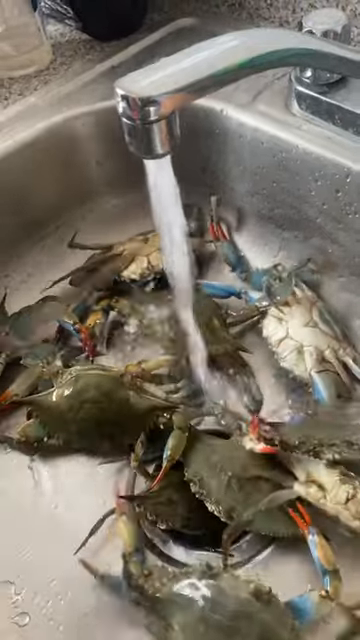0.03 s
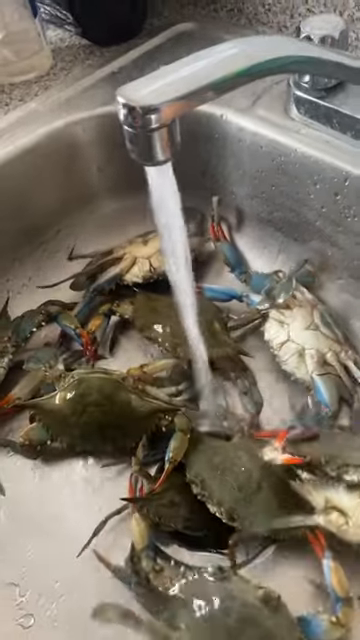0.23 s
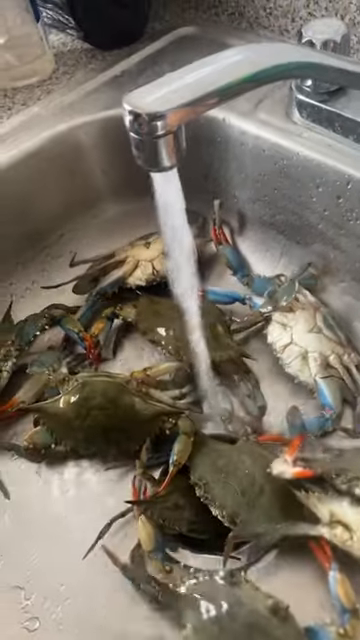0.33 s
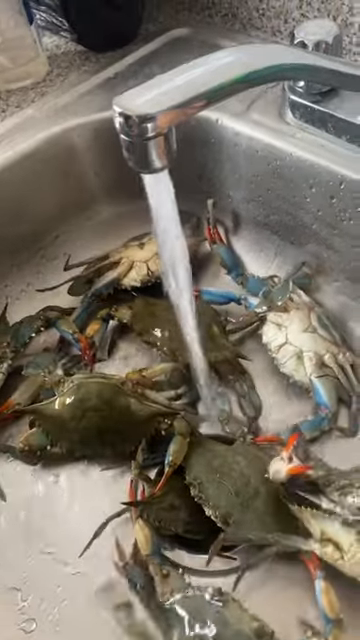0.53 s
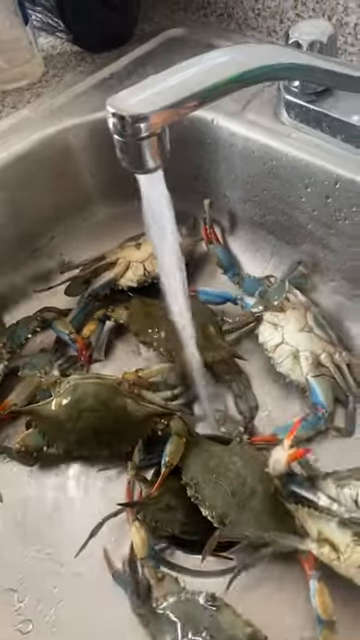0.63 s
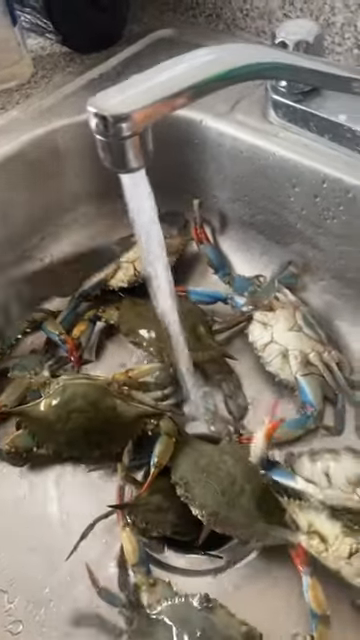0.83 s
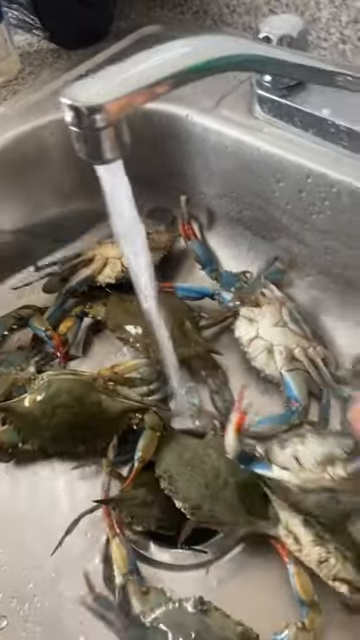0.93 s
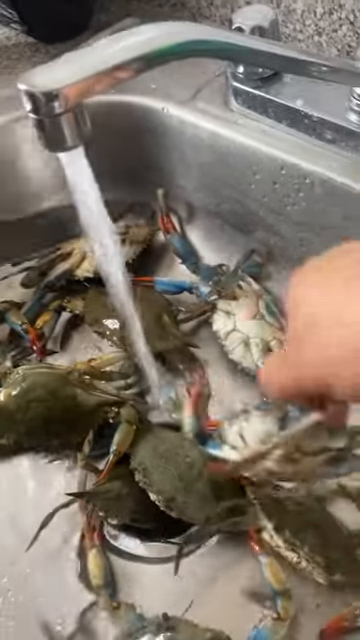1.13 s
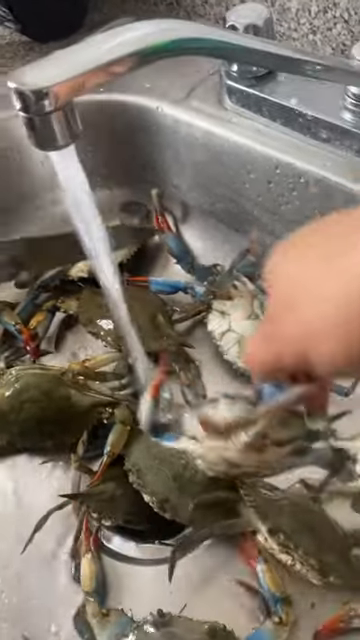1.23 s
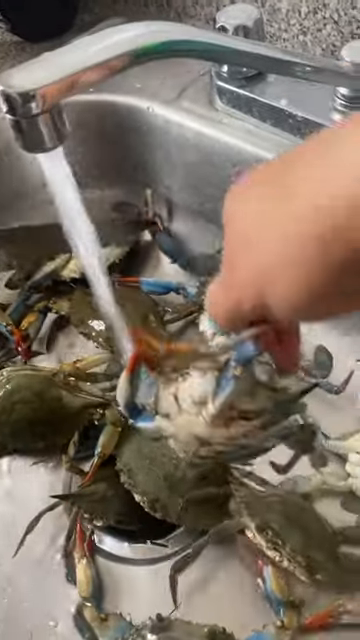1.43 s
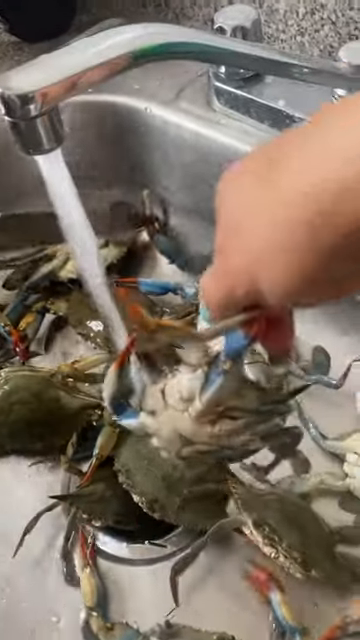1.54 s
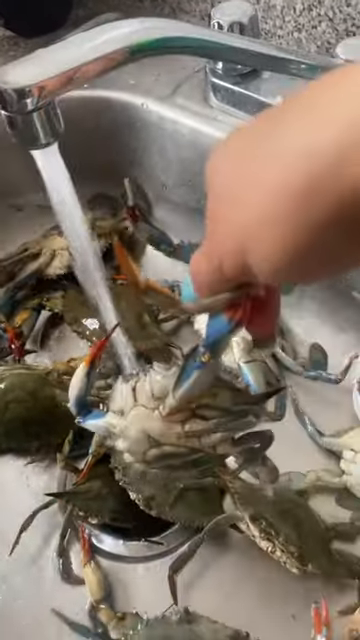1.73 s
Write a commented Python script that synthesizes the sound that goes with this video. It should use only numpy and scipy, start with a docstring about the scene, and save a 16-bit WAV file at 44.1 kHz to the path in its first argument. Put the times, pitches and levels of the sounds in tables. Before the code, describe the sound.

Tap water runs steadily into a steel sink while crabs knock and click against it.

```python
"""A tap runs steadily into a steel sink full of live crabs.
The aerated jet hisses, spatters on the shells, traps tiny bubbles and drums on the basin floor.
Crabs are handled: two bodies knock and set the steel ringing, the basin thumps,
legs tap, and shells drag and click. The sink walls and a small kitchen add short reflections."""
import sys
import numpy as np
from scipy import signal
from scipy.fft import rfft, irfft, next_fast_len
from scipy.io import wavfile

SR = 44100
rng = np.random.default_rng(int(sys.argv[2]) if len(sys.argv) > 2 else 0)


def materialize(psi):
    """Save the field psi as 16-bit PCM at rate SR to the path in sys.argv[1].

    A 1-D psi becomes a single channel; in a 2-D psi each row is a channel.
    """
    bounded = np.clip(np.atleast_2d(psi).T, -1, 1)
    quanta = np.round(bounded * 32767).astype(np.int16)
    wavfile.write(sys.argv[1], SR, quanta)


N = 79380
T = np.arange(N) / SR


# tone of the jet's hiss and spatter: freq_hz, level_db
SPLASH_TONE = [(60, -31), (300, 9), (500, 3.5), (750, 3), (1130, 3), (1550, 3), (1850, -2.5), (2300, 1.5),
               (2900, -3.5), (3400, 1), (4000, -6), (4700, -4), (5600, 1), (7000, -11), (8000, -12),
               (9300, -4), (11500, -11.5), (14000, -20.5), (16000, -28)]
# the splash rides up and down as crabs shift under the jet: time_s, gain_db
SPLASH_RIDE = [(0, -2), (.3, 0), (.6, -1.5), (.9, -1), (1.25, 0.7), (1.55, -0.5), (1.8, -0.5)]

def splash():
    """The jet hisses, its drops spatter and small bubbles ring briefly."""
    hiss_db, spatter_db, bubble_db = -45.5, -44.5, -48
    spatter = unit_rms(colour(impacts(per_s=3000, spread_db=3), SPLASH_TONE))
    bubbles = droplets(per_s=500, spread_db=2.5, low_hz=1260, high_hz=5350, ring_cycles=17.4)
    hiss = from_db(hiss_db) * noise(SPLASH_TONE)
    water = hiss + from_db(spatter_db) * spatter * flurries() + from_db(bubble_db) * bubbles
    return water * fader(SPLASH_RIDE)


# EQ of the spray that lands all round the sink: freq_hz, gain_db
SPRAY_EQ = [(100, -25), (350, -9), (700, 0), (1200, -2), (1900, -4), (3000, 2), (5000, 1), (7000, -6),
            (16000, -8)]

def stream():
    """The splash under the jet sits in the centre; scattered spray spreads it wide."""
    centre = splash()
    spray = colour(np.array([splash(), splash()]), SPRAY_EQ)
    return centre + from_db(-4.5) * spray


# spatter as the lifted crab breaks up the jet: time_s, level_db
SPATTER_RIDE = [(0, -65), (1.08, -52.5), (1.23, -46), (1.34, -54), (1.54, -52.5), (1.63, -60), (1.8, -42)]
# large drops bursting on the shells: start_s, level_db, pitch_hz
SPLATS = [(1.1446, -36.5, 3370), (1.2194, -31, 4030), (1.251, -34.5, 3560), (1.3004, -32, 3360),
          (1.3707, -37, 3520), (1.4189, -32, 3910), (1.4685, -39, 3410), (1.5465, -33, 3380),
          (1.5666, -34.5, 3150), (1.5887, -31, 3350), (1.7258, -33, 4460)]

def shell_spatter():
    """Water glances off the lifted crab: dense droplets, and large splats that each trap a bubble."""
    swell_s, t60_s = .00043, .024
    fine_drops = droplets(per_s=650, spread_db=0, low_hz=2590, high_hz=4800, ring_cycles=26)
    out = fader(SPATTER_RIDE) * fine_drops
    spray = rng.standard_normal(N)
    for start, db, hz in SPLATS:
        burst = unit_rms(band(spray, hz, width_hz=.38 * hz)) * envelope(start, swell_s, t60_s)
        bubble_ping = from_db(2) * ring(start, hz, swell_s, t60_s)
        out = out + from_db(db) * (burst + bubble_ping)
    return out


# resonances of the basin under the jet: pitch_hz, width_hz, level_db
BASIN_RESONANCES = [(52.4, 42, -47), (76.2, 7.4, -45), (101.5, 27, -44), (139.3, 24.6, -42.5),
                    (201.8, 39, -48), (312.6, 25, -57), (395, 103, -55.5), (505.3, 47, -53),
                    (595, 47, -54.5), (1125, 87, -52), (2267, 130, -53)]

def drumming():
    """Falling water keeps the basin sounding; its higher resonances are wider in stereo."""
    out, widest_from_hz = 0, 650
    for hz, width_hz, db in BASIN_RESONANCES:
        drive = rng.standard_normal((2, N + SR))   # an extra second lets the resonance build
        mid, side = unit_rms(band(drive, hz, width_hz)[:, SR:])
        side_share = .3 * min(hz / widest_from_hz, 1) ** 2
        out = out + from_db(db) * (unit_rms(mid) + side_share * side * np.array([[1], [-1]]))
    return out


# bodies landing and settling: start_s, level_db, spot (0 to 2), ring_share (1 = undamped), crack_db
KNOCKS = [(0.2353, 0, 0.039, 0.93, -18), (.2545, -9.5, 1.85, 0.73, -25.5), (.39, -22, 0.23, 0.35, -70),
          (1.481, -2, 1.02, 0.25, -32), (1.4931, 5.5, 0.55, 0.08, -34), (1.514, -19.5, 0.84, 1, -35),
          (1.633, -35, 1, 0.9, -37), (1.69, -32, 0.98, 0.65, -52)]
# modes of the steel: pitch_hz, t60_s, pan_left_db, spot_0_db, spot_1_db, spot_2_db
STEEL_MODES = [(225, 0.16, 0, -38, 1.5, -40), (244.6, 0.16, 0, -11, -8, -29), (295, .14, -1, -6.5, -7, -23),
               (327.3, 0.27, 0, -10, -39, -11), (347.9, 0.25, .5, -2.5, -3, -22),
               (380, 0.36, -1, -25, -11.5, -30), (502.6, 0.13, 0, -29, -35, 4),
               (628, 0.48, -2, -29, -28, -26), (657.6, 0.16, -4, -29, -13, -5.5),
               (786, 0.2, 4, -29, -20, -34), (1012, 0.28, 8, -19.5, -59, -14),
               (1044, .14, 0, -14, -54, -25), (1312, 0.54, 0, -37, -61, -35),
               (1541, 0.14, 2, -26.5, -29, -11.5), (2275, 0.085, -12, -22, -60, -38),
               (2375, 0.072, -12, -20, -48, -44)]
# tone of shell hitting steel: freq_hz, level_db
CRACK_TONE = [(200, 2.5), (900, 4.5), (1700, -1), (2800, -11), (4000, -10.5), (6000, -11.5), (10000, -21),
              (16000, -53)]

def knocks():
    """A shell cracks on the steel, whose modes ring according to the spot; a resting body damps them."""
    lead_s = .0013   # the shell touches just before the steel gives
    out, crack = 0, noise(CRACK_TONE)
    for start, db, spot, ring_share, crack_db in KNOCKS:
        for k, (hz, t60_s, pan_db, *spot_db) in enumerate(STEEL_MODES):
            stereo_db = db + np.interp(spot, [0, 1, 2], spot_db) + pan_db * PAN
            polarity = (-1) ** (k // 2)
            mode = ring(start, hz, swell_s=.0048, t60_s=t60_s * ring_share)
            out = out + polarity * from_db(stereo_db) * mode
        out = out + from_db(crack_db) * crack * envelope(start - lead_s, HARD_ATTACK_S, t60_s=.075)
    return out


# soft, low bumps: start_s, level_db, pitch_hz
THUMPS = [(0.252, -30, 112), (0.486, -29.5, 102), (0.941, -21.5, 117), (0.997, -22.5, 90.6),
          (1.006, -23, 141.3), (1.05, -16, 88.5), (1.139, -30.5, 120), (1.313, -19, 106.5),
          (1.365, -26, 141.4), (1.482, -20.5, 162.4), (1.486, -27, 53), (1.605, -35, 86.5)]

def thumps():
    """Soft bumps flex the floor of the basin."""
    return sum(from_db(db) * ring(start, hz, swell_s=.0009, t60_s=.18) for start, db, hz in THUMPS)


# legs on the basin: start_s, level_db, pitch_hz, answer_db
LEG_TAPS = [(.443, -33.5, 1102, -29.5), (0.462, -32, 1240, -29), (0.505, -18.5, 1125, -24),
            (0.556, -36, 1295, -23.5), (0.5821, -23, 936, -17.5), (0.746, -36.5, 1136, -22.5),
            (0.951, -33, 1127, -30.5), (0.9932, -22.5, 970, -27), (1.044, -30, 976, -27.5)]

def leg_taps():
    """A leg lands with a hollow tap and a little scuff; the basin answers with a lower note."""
    swell_s, t60_s = .0012, .06
    out, scuff = 0, from_db(-13.5) * noise(CRACK_TONE)
    for start, db, hz, answer_db in LEG_TAPS:
        tap = ring(start, hz, swell_s, t60_s) + scuff * envelope(start, swell_s, t60_s)
        answer = ring(start, hz=407.9, swell_s=.01, t60_s=.13)
        out = out + from_db(db) * tap + from_db(answer_db) * answer
    return out


# shell and claw clicks: start_s, level_db, pitch_hz, t60_s, snap_over_ring_db
CLICKS = [(0.561, -27, 3140, .0084, -5), (0.5833, -20, 1960, 0.0031, -5.5), (0.7127, -31, 2560, 0.031, -30),
          (1.578, -28, 1570, 0.018, -28), (1.6786, -14, 2540, 0.016, -12.5), (1.6799, -22, 1590, 0.027, -9),
          (1.6905, -17.5, 1750, 0.024, -14)]
# tone of the snap: freq_hz, level_db
SNAP_TONE = [(300, -4), (1000, 7), (1600, -2), (2500, -4), (5000, -8), (9000, -22), (16000, -37)]
# faint ring of the lifted crab's shell: pitch_hz, level_db, t60_s
SHELL_MODES = [(1766, -35, 0.35), (2020, -34, 0.1), (2230, -25, 0.053)]

def shell_clicks():
    """Hard shell on shell: a snap and one short ring; the lifted shell rings on."""
    out, snap_noise, shell_start_s = 0, noise(SNAP_TONE), 1.68
    for start, db, hz, t60_s, snap_db in CLICKS:
        snap = from_db(snap_db) * snap_noise * envelope(start, HARD_ATTACK_S, t60_s=.018)
        out = out + from_db(db) * (ring(start, hz, HARD_ATTACK_S, t60_s) + snap)
    for hz, db, t60_s in SHELL_MODES:
        out = out + from_db(db) * ring(shell_start_s, hz, HARD_ATTACK_S, t60_s)
    return out


# brittle top on the hardest hits: start_s, level_db
TICKS = [(0.2376, -23.5), (1.6787, -20.5)]
# tone of the tick: freq_hz, level_db
TICK_TONE = [(1500, -9), (3500, 2), (5500, 1), (9500, -12.5), (16000, -22)]

def edge_ticks():
    """A very short, bright burst as a shell edge strikes."""
    bursts = sum(from_db(db) * envelope(start, HARD_ATTACK_S, t60_s=.016) for start, db in TICKS)
    return noise(TICK_TONE) * bursts


# shells dragging over the steel: start_s, length_s, level_db, centre_hz
SCUFFS = [(0.299, 0.075, -38, 550), (0.432, 0.071, -42, 970), (0.523, 0.051, -38.5, 980),
          (0.592, 0.064, -42, 950), (0.691, 0.063, -44, 2700), (0.458, 0.16, -41, 237),
          (0.927, 0.17, -34, 151), (1.026, 0.072, -37, 500), (1.055, 0.064, -35.5, 167),
          (1.367, 0.03, -40.5, 1540), (1.457, 0.1, -33, 142), (1.592, 0.17, -37, 284),
          (1.665, 0.1, -41.5, 1710), (1.668, 0.14, -42.5, 674)]

def scuffs():
    """A drag is a run of tiny slips into a broad resonance, swelling and fading."""
    out = 0
    for start, length, db, hz in SCUFFS:
        slips = impacts(per_s=1400, spread_db=2.5)
        stroke = np.sin(np.pi * np.clip((T - start) / length, 0, 1))
        out = out + from_db(db) * stroke * unit_rms(band(slips, hz, width_hz=.71 * hz))
    return out


# EQ of the sink and kitchen reverb: freq_hz, gain_db
REVERB_EQ = [(100, -35), (350, -17), (700, -1), (1200, -3), (1900, -4), (3000, 2), (5000, 1), (7000, -7),
             (16000, -9)]

def reflections(x, t60_s):
    """Walls throw the sound back as a diffuse tail, different at each ear."""
    tail = rng.standard_normal((2, N)) * envelope(.001, .001, t60_s)
    tail = tail / np.sqrt(np.sum(tail ** 2, axis=1, keepdims=True))
    tail = colour(tail, REVERB_EQ)[:, :SR // 2]
    return signal.fftconvolve(x, tail, axes=1)[:, :N]


def droplets(per_s, spread_db, low_hz, high_hz, ring_cycles):
    """Tiny bubbles at many pitches, each dying by 60 dB over ring_cycles; unit power."""
    pitches = np.geomspace(low_hz, high_hz, 40)
    births = impacts(per_s, spread_db)
    pitch_index = rng.integers(0, len(pitches), N)
    width_share = np.log(1000) / np.pi / ring_cycles
    pings = sum(resonate(births * (pitch_index == k), hz, width_share * hz)
                for k, hz in enumerate(pitches))
    return unit_rms(flurries() * pings)


def flurries(depth_db=2.5, speed_hz=30):
    """Drops and bubbles come in flurries: a gain that swells and sinks quickly at random."""
    lowpass = signal.butter(2, speed_hz, fs=SR, output="sos")
    wander = signal.sosfilt(lowpass, rng.standard_normal(N + SR))[SR:]
    return from_db(depth_db * unit_rms(wander))


def impacts(per_s, spread_db):
    """Random clicks; spread_db lifts a few above the many small ones."""
    sizes = from_db(spread_db * np.minimum(rng.exponential(1, N), 5))
    return (rng.random(N) < per_s / SR) * sizes * rng.choice([-1, 1], N)


def noise(tone):
    """Coloured noise of unit power."""
    return unit_rms(colour(rng.standard_normal(N), tone))


def ring(start, hz, swell_s, t60_s):
    """One struck mode."""
    return envelope(start, swell_s, t60_s) * np.sin(2 * np.pi * hz * (T - start))


def envelope(start, swell_s, t60_s):
    """Swells from the start and dies away."""
    age = np.maximum(T - start, 0)
    return (1 - np.exp(-age / swell_s)) * np.exp(-np.minimum(np.log(1000) * age / t60_s, 50))


def resonate(x, hz, width_hz):
    """One resonance with unity gain at its peak."""
    r = np.exp(-np.pi * width_hz / SR)
    feedback = [1, -2 * r * np.cos(2 * np.pi * hz / SR), r * r]
    return signal.lfilter(np.array([1, 0, -1]) * (1 - r * r) / 2, feedback, x + 1e-18)


def band(x, hz, width_hz):
    """The same resonance twice, for steeper skirts."""
    return resonate(resonate(x, hz, width_hz), hz, width_hz)


def colour(x, curve):
    """Apply a smooth EQ curve."""
    size = x.shape[-1]
    return irfft(rfft(x) * from_db(at_hz(curve, np.fft.rfftfreq(size, 1 / SR))), size)


def at_hz(curve, hz):
    """Read an EQ curve on a log-frequency axis."""
    freqs, db = np.transpose(curve)
    return np.interp(np.log(hz + 1), np.log(freqs), db)


def fader(ride):
    """Turn a level ride into a gain over time."""
    return from_db(np.interp(T, *np.transpose(ride)))


def from_db(db):
    """Decibels to gain."""
    return 10 ** (np.asarray(db) / 20)


def unit_rms(x):
    """Scale to unit power."""
    return x / np.sqrt(np.mean(x ** 2) + 1e-20)


HARD_ATTACK_S = .00014   # onset of every crack, click and tick
PAN = np.array([[.5], [-.5]])   # splits a left-minus-right amount between the channels

def scene():
    """Water and crabs in the sink, in a small kitchen."""
    water = stream() + shell_spatter() + drumming()
    crabs = knocks() + thumps() + leg_taps() + scuffs() + shell_clicks() + edge_ticks()
    sink = water + crabs
    sink_walls = from_db(-6.5) * reflections(sink, t60_s=.035)
    kitchen = from_db(-16) * reflections(sink, t60_s=.4)
    return sink + sink_walls + kitchen


# phase lead of the left microphone port: freq_hz, lead_rad
LEFT_LEAD = [(0, 0), (160, -.06), (330, -.24), (500, -.4), (1120, -.6), (1900, 0), (2500, .8), (4700, .3),
             (5600, 1.0), (7300, 3.14), (10500, 6.28), (13400, 9.42), (16000, 12.5)]
# slight lift of the right port over the left: freq_hz, gain_db
RIGHT_LIFT = [(300, 0), (1200, .9), (1900, .6), (3200, 2.6), (6000, .2)]

def record(dry):
    """Two spaced microphone ports; rumble is cut, peaks are rounded and the top is rolled off."""
    low_cut_hz, high_cut_hz, ceiling = 36, 15800, .95
    size = next_fast_len(N + SR // 10)
    hz = np.fft.rfftfreq(size, 1 / SR)
    phase = np.exp(1j * PAN * np.interp(hz, *np.transpose(LEFT_LEAD)))
    balance = from_db(-PAN * at_hz(RIGHT_LIFT, hz))
    heard = irfft(rfft(dry, size) * phase * balance, size)[:, :N]
    heard = signal.sosfilt(signal.butter(3, low_cut_hz, "high", fs=SR, output="sos"), heard)
    heard = heard / (1 + (heard / ceiling) ** 6) ** (1 / 6)
    return signal.sosfilt(signal.ellip(10, .1, 70, high_cut_hz, fs=SR, output="sos"), heard)


dry = scene()
out = record(dry)
materialize(out)
```